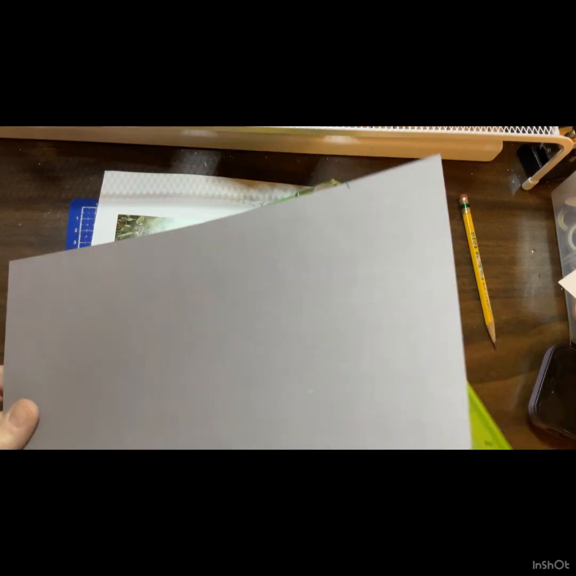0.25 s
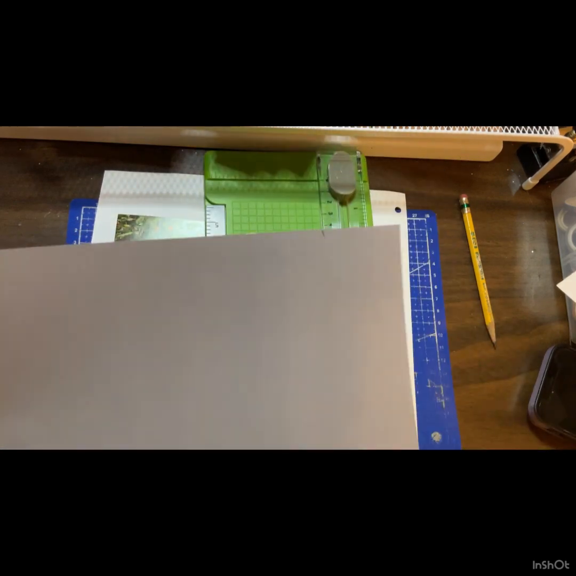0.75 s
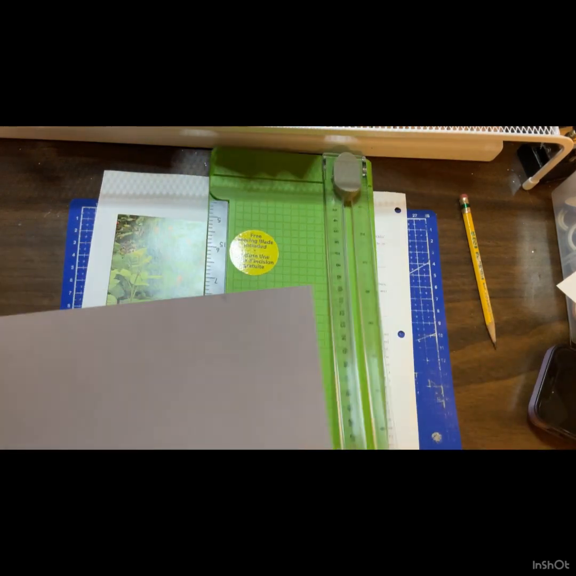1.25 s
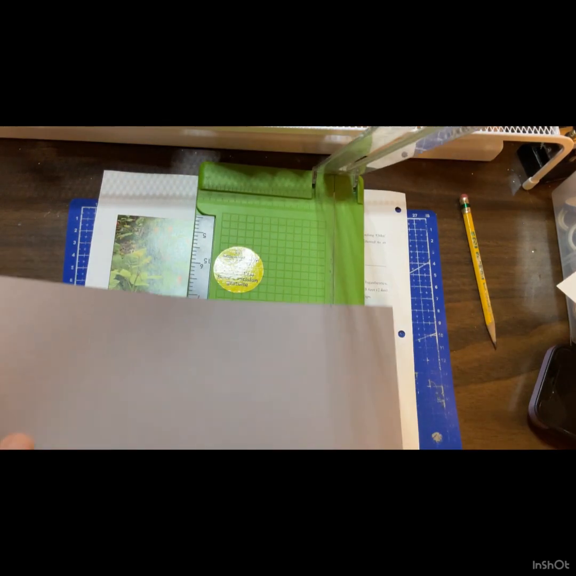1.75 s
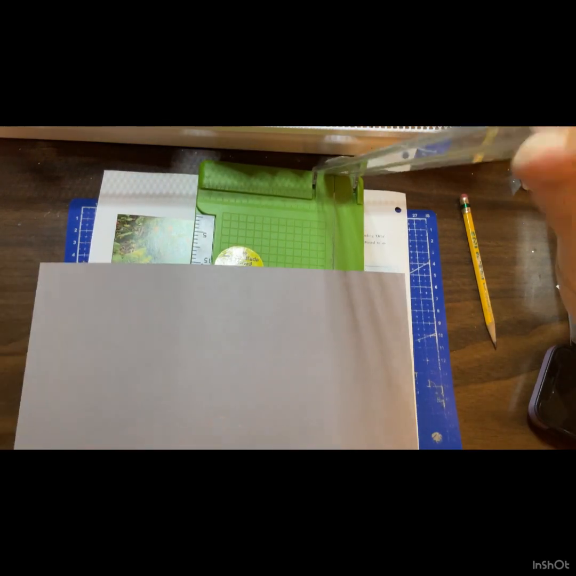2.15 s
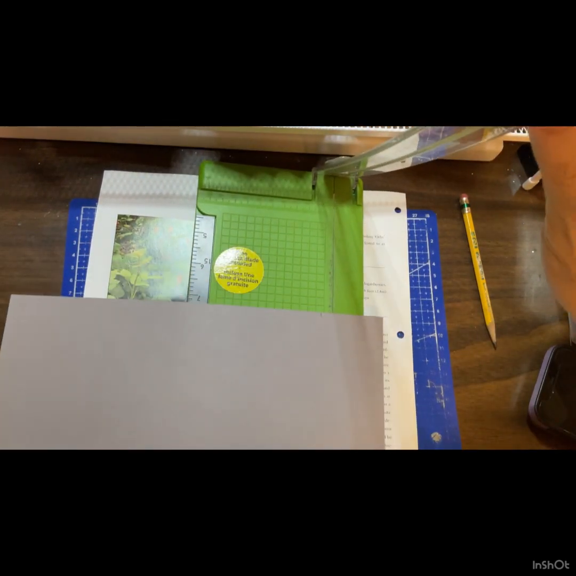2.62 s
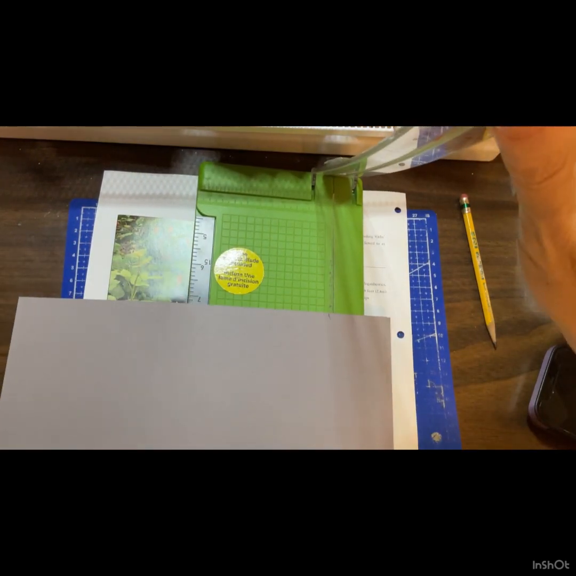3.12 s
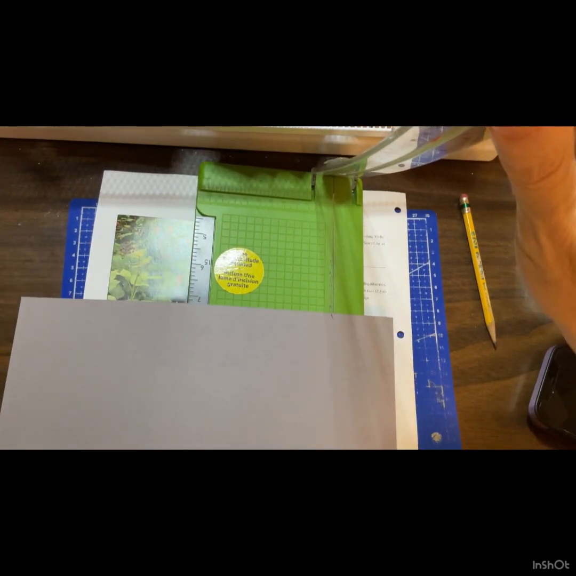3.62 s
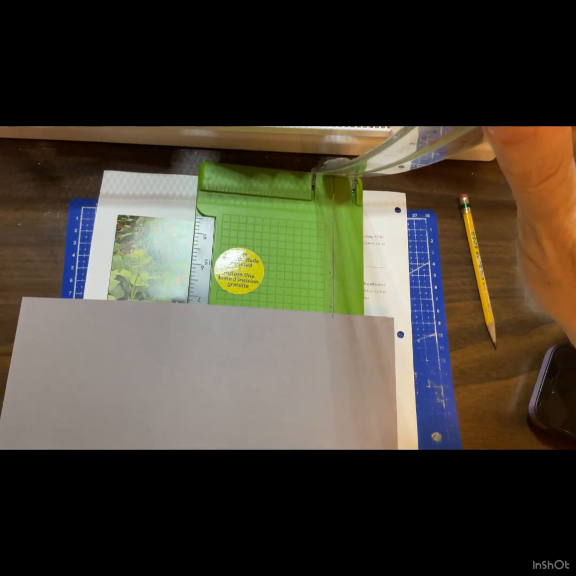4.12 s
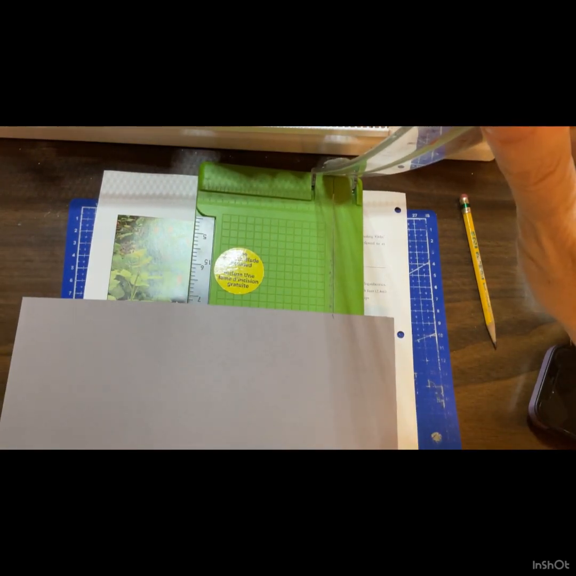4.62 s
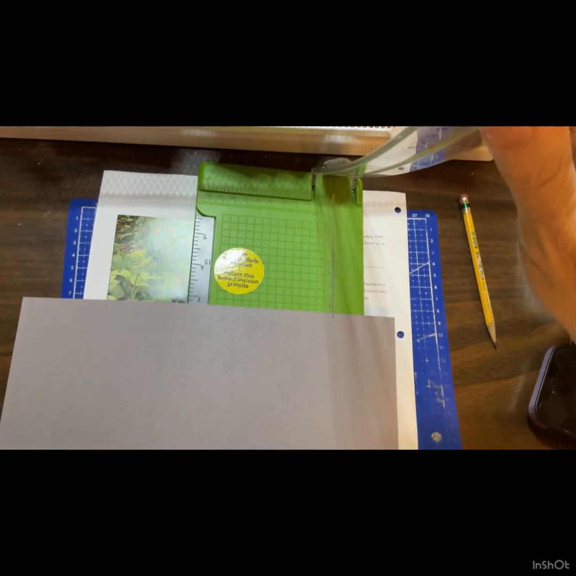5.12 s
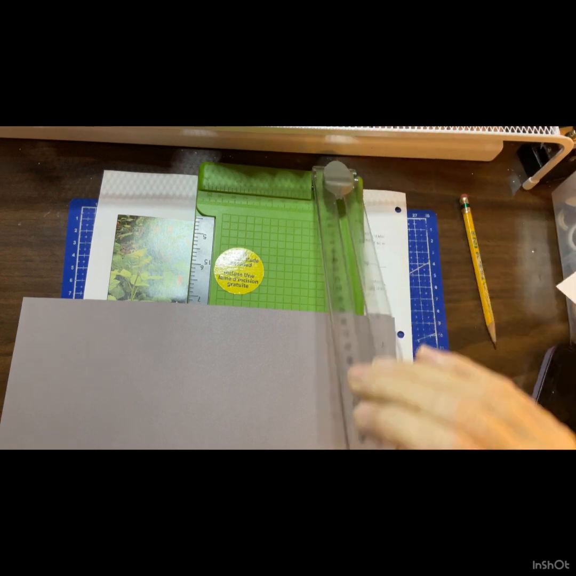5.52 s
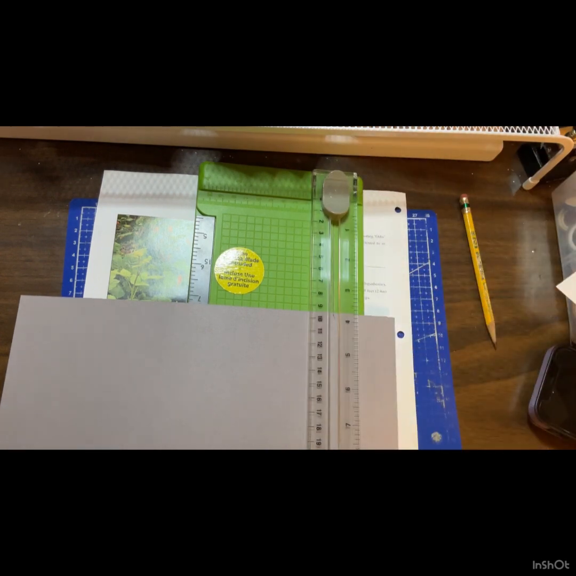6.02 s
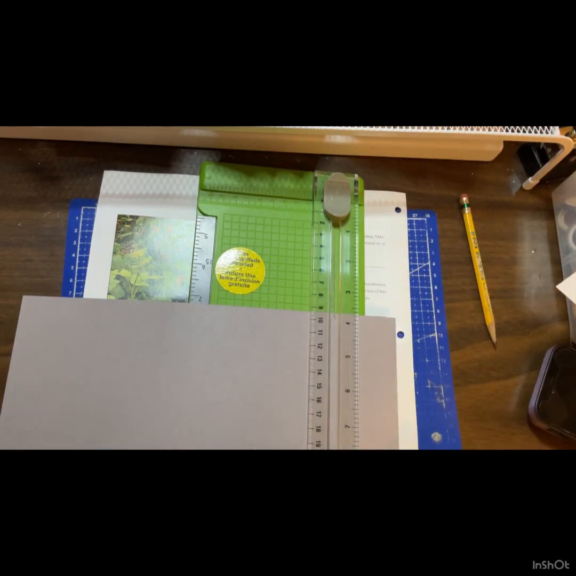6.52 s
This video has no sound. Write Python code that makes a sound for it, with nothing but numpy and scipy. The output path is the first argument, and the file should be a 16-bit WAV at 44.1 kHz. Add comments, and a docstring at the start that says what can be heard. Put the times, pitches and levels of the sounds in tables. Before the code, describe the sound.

A plastic paper trimmer knocks onto a wooden desk, paper slides over it, and its ruler arm clacks open and snaps shut.

```python
"""Plastic knocks and clacks: a paper trimmer is set down on a wooden desk, and later its ruler arm
swings open with dry ticks and snaps shut. Each knock is a rattle of tiny bounces that rings the hollow
base and the arm and thumps the desk. Paper slides over the base in short strokes, hissing as its fibres
catch, and rubbing plastic whistles faintly. Behind it are soft blips and the hum of a quiet room."""
import sys
import numpy as np
from scipy import signal
from scipy.fft import rfft, irfft
from scipy.io import wavfile
from scipy.ndimage import uniform_filter1d

SR = 44100
rng = np.random.default_rng(int(sys.argv[2]) if len(sys.argv) > 2 else 0)


def inscribe(sig):
    """Save sig as 16-bit PCM at rate SR to the path in sys.argv[1].

    A 1-D sig is mono; a 2-D sig holds one channel per row.
    Samples are clipped to [-1, 1] before scaling.
    """
    pcm = np.round(np.clip(np.atleast_2d(sig).T, -1, 1) * 32767)
    wavfile.write(sys.argv[1], SR, pcm.astype(np.int16))


N = 298116

# The notes at which the hollow base rings. Each row: pitch in Hz, width in Hz, level in dB.
BASE_MODES = [(440, 200, -2), (768, 67, 5), (1108, 59, 4), (1533, 150, -1), (2100, 68, -7.5),
              (2180, 430, -7.5), (2800, 25, -14)]


def gain_of(db):
    """Turns decibels into a number to multiply by."""
    return 10 ** (np.asarray(db) / 20)


def evened(x):
    """Scales a sound to an average (rms) level of 1."""
    return x / np.sqrt(np.mean(x ** 2) + 1e-20)


def value_at(points, hz):
    """Looks up a value between rows of frequency and value, on a scale of octaves."""
    f, value = np.transpose(points)
    return np.interp(np.log(hz + 1), np.log(f + 1), value)


def colour(x, points):
    """Turns each frequency up or down, following rows of Hz and dB."""
    return irfft(rfft(x) * gain_of(value_at(points, np.fft.rfftfreq(len(x), 1 / SR))), len(x))


def passed(x, hz, kind):
    """Keeps the part of a sound below ("low") or above ("high") a frequency."""
    return signal.sosfilt(signal.butter(4, np.clip(hz, 20, 15000), kind, fs=SR, output="sos"), x)


def drift(seconds):
    """A smooth random wobble of size 1 that changes over about this many seconds."""
    size = max(round(seconds * SR), 2)
    return evened(uniform_filter1d(uniform_filter1d(rng.standard_normal(N), size), size))


def ring(x, modes, pitch_factor=1):
    """Lets a sound ring an object's notes, given as rows of pitch in Hz, width in Hz and level in dB."""
    out = 0
    for k, (hz, width, db) in enumerate(modes):
        decay = np.exp(-np.pi * width / SR)
        turn = decay * np.exp(2j * np.pi * hz * pitch_factor / SR)
        out = out + (-1) ** k * gain_of(db) * signal.lfilter([1 - decay], [1, -turn], x).real
    return out


def background():
    """Steady air and microphone hiss, and a motor hum that wavers in pitch and level."""
    # The tone of the hiss. Each row: frequency in Hz, level in dB.
    air_tone = [(24, -44), (40, -11.5), (123, -8.5), (151, -22.5), (268, -25.5), (913, -34.5), (1170, -31),
                (1400, -37), (6000, -39.5), (13000, -37.5), (15800, -42)]
    air_db, hum_db, hum_hz = -63.5, -62.5, 120
    waver_db = .5 * drift(.15)
    air = evened(colour(rng.standard_normal(N), air_tone)) * gain_of(air_db + waver_db)
    turns = np.cumsum(hum_hz + 4.5 * drift(.03)) / SR
    return air + gain_of(hum_db + 2.0 * drift(0.014)) * np.sin(2 * np.pi * turns)


def room_echo(x):
    """The room sends back scattered echoes; each frequency dies away at its own speed."""
    # How long the room rings. Each row: frequency in Hz, seconds to fade by 60 dB.
    fade_times = [(100, 0.54), (300, 0.037), (1000, 0.14), (4000, 0.14), (12000, 0.099)]
    echoes = np.zeros(SR // 2)
    at = np.arange(130, len(echoes) - 20, 20)
    echoes[at + rng.integers(0, 20, len(at))] = rng.choice([-1., 1.], len(at))
    hz, t, bands = signal.stft(echoes, SR, nperseg=256)
    fade = gain_of(-60 * t / value_at(fade_times, hz)[:, None])
    tail = signal.istft(bands * fade, SR, nperseg=256)[1]
    return signal.fftconvolve(x, tail / np.linalg.norm(tail))[:N]


def blips():
    """Faint, short, breathy notes, most of them near one pitch."""
    # Each row: time in seconds, level in dB, pitch in Hz.
    notes = [(2.75, -62, 1128), (3.865, -76, 2650), (4.196, -72, 1043), (3.075, -68.5, 1030),
             (3.171, -61, 1114), (3.35, -74.5, 1033), (3.6479, -73, 970), (3.738, -66, 1110),
             (3.9042, -68.5, 1060), (4.38, -72.5, 1137), (4.87, -69, 1156), (5.137, -63.5, 1140),
             (5.453, -64.5, 1170), (6.0847, -62, 1150), (6.6547, -65, 1138)]
    out, length = np.zeros(N + SR), 2400
    for start, db, hz in notes:
        note = evened(ring(rng.standard_normal(length), [(hz, 110, 0)])) * np.hanning(length)
        out[round(start * SR) - 300:][:length] += gain_of(db) * note
    return out[:N]


def plastic_whistles():
    """Plastic rubbing on plastic whistles faintly: a narrow band of noise with a gliding pitch."""
    # One list for each whistle. Each row: time in seconds, pitch in Hz, level in dB.
    glides = [
        [(.48, 2050, -62), (.59, 2094, -65.5)],
        [(1.79, 1410, -44), (1.85, 1350, -46.5), (1.884, 1480, -29)],
        [(1.836, 815, -43.5), (1.884, 803, -42)],
        [(2.485, 1895, -44), (2.545, 1960, -66)],
        [(1.455, 2200, -60), (1.55, 2153, -52.5), (1.67, 2080, -71)],
    ]
    out, t = np.zeros(N), np.arange(N) / SR
    for rows in glides:
        times, pitches, levels = np.transpose(rows)
        hz, db = np.interp(t, times, pitches), np.interp(t, times, levels)
        fade = np.clip(np.minimum(t - times[0], times[-1] - t) / 0.005, 0, 1)
        a, b = passed(rng.standard_normal((2, N)), 200, "low")
        phase = 2 * np.pi * np.cumsum(hz) / SR
        whistle = evened(a * np.cos(phase) + b * np.sin(phase))  # moves the low noise up to the pitch
        out += fade * gain_of(db + 1.8 * drift(0.03)) * whistle
    return out


def sliding_gains():
    """Each stroke rises, holds and falls; gives the strength of the upper hiss, lower hiss and scrape."""
    # Paper and plastic sliding. Each row: time of full speed, rise, hold and fall (all in seconds),
    # hiss level in dB, scrape in dB above the hiss.
    strokes = [(0, .01, 0.0018, 0.046, -46.5, 0), (0.257, 0.14, .01, .05, -66, 8.5),
               (0.327, 0.063, 0.044, 0.091, -39.5, 4), (0.426, .03, 0.094, 0.081, -53, -1),
               (0.698, 0.07, 0.029, 0.059, -65, -51), (1.075, 0.086, 0.01, 0.3, -68.5, 9),
               (1.412, 0.061, 0.024, 0.15, -49.5, -3), (1.534, 0.078, 0.041, 0.097, -52.5, 1),
               (1.75, 0.078, 0.023, 0.063, -63, 15), (1.855, 0.13, 0.026, 0.022, -44, -0.5),
               (1.885, 0.038, 0.078, 0.04, -53.5, 4), (2.043, 0.058, 0.0064, 0.052, -77.5, 23.5),
               (2.206, 0.003, 0.06, 0.22, -40, -10.5), (2.286, 0.068, .01, 0.14, -38, -10),
               (2.399, 0.088, 0.11, 0.046, -52, 2.5), (2.539, 0.04, 0.035, 0.045, -49, -11.5),
               (2.683, 0.022, 0.07, 0.035, -56, -7), (2.823, 0.033, 0.013, 0.06, -49.5, -13),
               (3.183, 0.087, 0.0091, 0.04, -75, 8.5), (5.157, 0.092, 0.0057, 0.085, -54, -19),
               (5.376, 0.062, .005, 0.089, -60, -21), (5.745, 0.033, 0.013, 0.041, -66, -16),
               (5.921, 0.053, 0.0069, 0.084, -54, 15.5), (6.014, 0.31, 0.041, 0.088, -57, -45),
               (6.275, 0.013, 0.0028, 0.049, -44, 19.5), (6.443, 0.17, 0.013, 0.057, -69.5, 3)]
    # Hands resting and shifting on the sheet. Each row: start and end in seconds, hiss level in dB.
    fidgets = [(1.223, 1.377, -66), (2.79, 2.985, -77.5), (5.38, 5.86, -75.5), (6.08, 6.254, -76.5),
               (6.402, 6.704, -77.5)]
    edge_s, edge_db, edge_curve = 0.022, -20, 1.7  # edge_db is the drop over one rise or fall time
    t, power = np.arange(N) / SR, np.zeros((3, N))
    touches = [(start, edge_s, end - start, edge_s, db, 8) for start, end, db in fidgets]  # as strokes
    wander_db = 6.5 * drift(0.15)
    for k, (start, rise, hold, fall, db, scrape_db) in enumerate(touches + strokes):
        before, after = (start - t) / max(rise, .003), (t - start - hold) / max(fall, .003)
        away = np.clip(np.maximum(before, after), 0, 4)
        is_touch = k < len(touches)
        level = gain_of(db + edge_db * away ** edge_curve + wander_db * is_touch)
        lower_db = -3.5 + 0.3 * min(scrape_db, 0)  # pressure that scrapes also fills in the lower hiss
        power += (level * gain_of([[0], [lower_db], [scrape_db]])) ** 2
    return np.sqrt(power)


def paper():
    """Fibres catching at random make a fine hiss; the drag shakes the base into a coarser scrape."""
    # The tones of the hiss and of the scrape. Each row: frequency in Hz, level in dB.
    hiss_tone = [(1650, -33), (4300, -3.5), (7610, -5), (10900, -5), (12500, -2.5), (15800, -5)]
    scrape_tone = [(120, -41), (200, -13.5), (310, -19.5), (419, 2.5), (538, -1), (700, 0), (923, -5),
                   (1450, -1), (2600, -1), (3700, -7), (5200, -44.5)]
    hiss = colour(rng.standard_normal(N) * gain_of(0.37 * drift(0.0012) + 0.89 * drift(.025)), hiss_tone)
    upper = evened(passed(hiss, 6400, "high"))
    other_fibres = np.roll(hiss, N // 3)
    lower = evened(passed(passed(other_fibres, 8000, "low"), 4500, "high"))
    judder_db = 2.2 * drift(.012) + 0.9 * drift(0.0036)
    drag = rng.standard_normal(N) * gain_of(judder_db)
    spot = np.pi * drift(0.04)  # the touch wanders over the base and shifts its ring
    low_ring, high_ring = ring(drag, BASE_MODES, .9), ring(np.roll(drag, 999), BASE_MODES, 1.15)
    hollow = evened(passed(np.cos(spot) * low_ring + np.sin(spot) * high_ring, 2300, "low"))
    upper_gain, lower_gain, scrape_gain = sliding_gains()
    firmness = np.clip((20 * np.log10(scrape_gain) + 62) / 14, .4, 1)
    lightness = np.sqrt(1 - firmness ** 2)  # a light touch brings out the hollow base
    scrape = firmness * evened(colour(drag, scrape_tone)) + 0.47 * lightness * hollow
    return upper_gain * upper + lower_gain * lower + scrape_gain * scrape


def hinge_tick(t):
    """The arm's hinge slips with a dry tick: a tiny burst of noise that rings briefly."""
    # The notes of the hinge. Each row: pitch in Hz, width in Hz, level in dB.
    hinge_modes = [(2300, 250, -8), (3540, 250, -2)]
    slip = rng.standard_normal(len(t)) * np.exp(-t / .0004)
    slip = slip / np.linalg.norm(slip)
    return 10 * ring(slip, hinge_modes) + 0.6 * slip


def ping(t, hz, fade_s):
    """One ringing note stands out from a knock and dies away."""
    note = evened(ring(rng.standard_normal(len(t)), [(hz, 130, 0)]))
    return note * np.clip(t / .002, 0, 1) * gain_of(-60 * t / fade_s)


def knock(db, clack_db, thump_db, fade_s, pitch_factor):
    """A dying rattle of tiny bounces rings the base and the arm, and pushes the desk."""
    # The notes of the stiff ruler arm. Each row: pitch in Hz, width in Hz, level in dB.
    arm_modes = [(4250, 120, 3.5), (5400, 82, -7), (6180, 920, -10), (7630, 63, -6.5), (9400, 27, -13.5)]
    # The tone of the plastic's clack. Each row: frequency in Hz, level in dB.
    clack_tone = [(1470, -43.5), (2500, -9.5), (4030, -1), (5090, -8), (8600, -8.5), (12900, -8.5),
                  (15800, -20.5)]
    desk_modes = [(125, 200, 6.5), (167.0, 11, -6.5), (293, 780, -1.5)]  # same columns as the arm
    t = np.arange(round(.25 * SR)) / SR
    grit, chance = rng.standard_normal((2, len(t)))
    bounce = gain_of(3.0 * evened(uniform_filter1d(chance, size=60)))  # contact comes and goes
    fade = gain_of(-60 * t / np.clip(fade_s, .01, .3))
    rattle = grit * bounce * fade
    blow = gain_of(1.0) * np.exp(-((t - .003) / .00013) ** 2)  # first full contact
    base = ring(rattle * np.clip(t / 0.0014, 0, 1) + blow, BASE_MODES, pitch_factor)
    base = passed(base, 2600 * pitch_factor, "low")
    arm = evened(passed(ring(grit, arm_modes), 3500, "high"))
    clack = (evened(colour(grit, clack_tone)) + 0.48 * arm) * bounce * fade * np.clip(t / 0.0019, 0, 1)
    push = rattle * np.clip(t / .008, 0, 1)
    thump = passed(ring(push, desk_modes), 450, "low")
    thump = passed(thump, 80, "high")  # the desk top is too small to make deeper bass
    early = slice(0, round(.02 * SR))  # each layer's level is set by its first 20 ms
    layers = ((base, 0), (clack, clack_db), (thump, thump_db))
    return sum(gain_of(db + above_db) * x / np.sqrt(np.mean(x[early] ** 2)) for x, above_db in layers)


def trimmer():
    """The plastic trimmer knocks, pings and ticks as it is handled."""
    # Each row: start in seconds, level of the base in dB, clack and desk thump in dB above the base,
    # seconds for the rattle to fade by 60 dB (capped at 0.3), factor on the pitch of the base.
    knocks = [(0.268, -27, -9.5, -34, 0.093, 1.14), (0.282, -30, -2, -7.5, 0.12, 0.87),
              (0.335, -33, -5, -12.5, 0.28, 0.97), (0.475, -44, -34, -14, 0.1, 0.81),
              (0.504, -46, -11, -8, 0.19, 0.95), (0.566, -52, -27, -30, 0.17, 0.71),
              (0.754, -48, -11.5, -30, 0.21, 0.94), (0.768, -45, -26, -45, 0.067, 0.7),
              (0.907, -55.5, -18, -32, 0.15, 0.7), (1.342, -48, -14, -18, 0.17, 0.98),
              (1.363, -52, -24, -28, 0.08, 0.8), (1.424, -48.5, -9, -26, 0.085, 1.08),
              (1.457, -46, -9, -14, 0.19, 0.95), (1.723, -29.5, -1, -40, 0.12, 1.03),
              (1.735, -24.5, -12, -13, 0.1, 0.91), (1.885, -44.5, -18, -16, 0.032, 0.45),
              (1.935, -43, -4.5, -3.5, 0.072, 1.14), (2.027, -53, -28, -11, 0.26, 1.08),
              (2.205, -42, -6, 4, 0.24, 0.74), (2.253, -53, -15, -1, 0.064, 1.5),
              (2.473, -37, -8, -37, 0.1, 0.65), (2.654, -78, -15, 14, 0.028, 0.49),
              (2.854, -70.5, -13, 3.5, 0.14, 0.38), (3.449, -68, -13, 1, 0.12, 0.53),
              (3.951, -74.5, -20, 16, 0.06, 0.71), (4.627, -76, -33, 18, 0.047, 1.05),
              (5.34, -62, 11.5, -14, 0.1, 1.1), (5.409, -68, -23, -5.5, 0.12, 0.47),
              (5.749, -60.5, -21, -22, 0.18, 0.34), (5.847, -49.5, -14, -9, 0.59, 1),
              (5.894, -23.5, -7.5, -22, 0.077, 1.05), (5.901, -32.5, 5.5, -24, 0.11, 1.63),
              (5.946, -37, -15, -12, 0.08, 1.42), (6.156, -44, -10, -10.5, 0.15, 0.9),
              (6.176, -31.5, -38, -23, 0.058, 1.0), (6.273, -18.5, 0.5, -9.5, 0.02, 0.99),
              (6.28, -25.5, 12, -15.5, 0.037, 0.89), (6.288, -35, 14, -9.5, 0.15, 1.35),
              (6.417, -62, -24.5, 6, 0.12, 1.04), (6.541, -65.5, -32, 6, 0.088, 0.71)]
    # Each row: start in seconds, level in dB, pitch in Hz, seconds to fade by 60 dB.
    pings = [(0.337, -32, 5570, .16), (1.723, -34, 4800, .14), (1.73, -27, 1010, .14),
             (2.029, -62, 5650, .2), (2.558, -55, 520, .07), (5.337, -52, 2300, .03), (6.164, -38, 900, .2),
             (5.896, -27, 780, .08), (6.272, -12, 1130, .05), (5.901, -33, 5550, .15)]
    # Slips of the hinge. Each row: start in seconds, level in dB.
    ticks = [(5.3387, -27), (5.346, -26), (5.35, -26), (5.362, -28)]
    out, t = np.zeros(N + SR), np.arange(SR // 4) / SR
    for start, *settings in knocks:
        sound = knock(*settings)
        out[round(start * SR):][:len(sound)] += sound
    for start, db, hz, fade_s in pings:
        out[round(start * SR):][:len(t)] += gain_of(db) * ping(t, hz, fade_s)
    for start, db in ticks:
        out[round(start * SR):][:len(t)] += gain_of(db) * hinge_tick(t)
    return out[:N]


def scene():
    """Mixes the trimmer and its echo with the paper and the quieter sounds, in one channel."""
    knocks = trimmer()
    echo = gain_of(-10.0) * room_echo(knocks)
    return (knocks + echo + paper() + plastic_whistles() + blips() + background())[None]


def record(dry):
    """The microphone drops the deep bass, clips the loudest peaks and loses the highest treble."""
    bass_hz, treble_hz = 52, 15970
    clipped = np.clip(passed(dry, bass_hz, "high"), -.93, .93)
    treble_cut = signal.firwin(511, treble_hz, window=("kaiser", 9), fs=SR)
    return signal.oaconvolve(clipped, treble_cut[None], "same")


dry = scene()
out = record(dry)
inscribe(out)
```